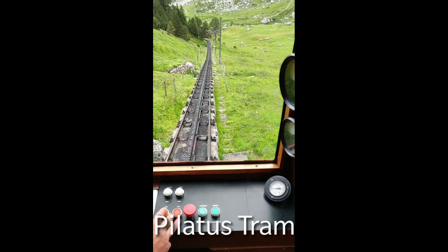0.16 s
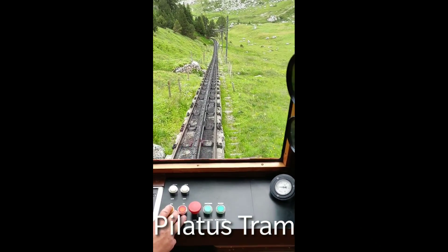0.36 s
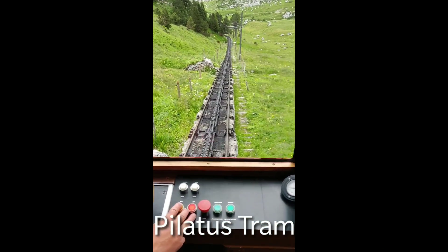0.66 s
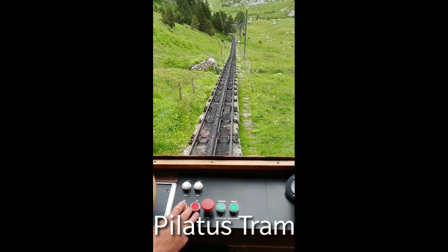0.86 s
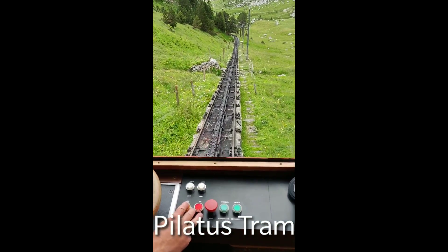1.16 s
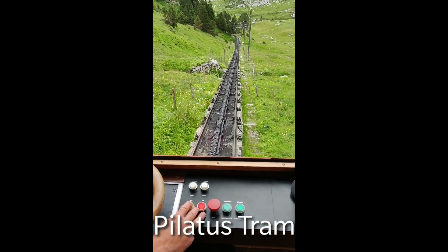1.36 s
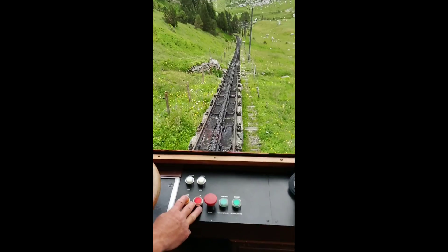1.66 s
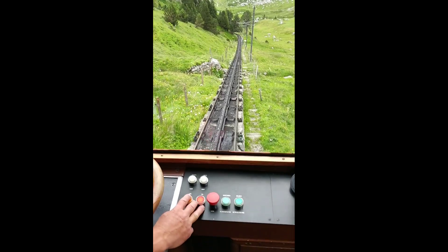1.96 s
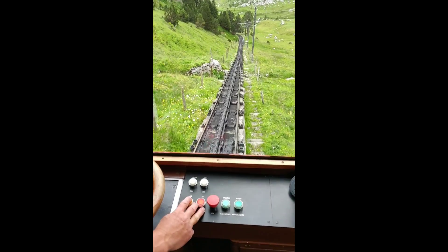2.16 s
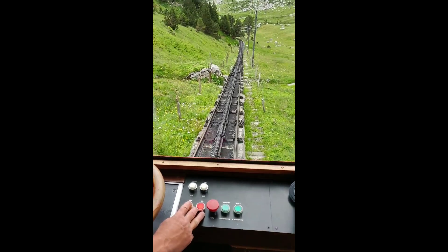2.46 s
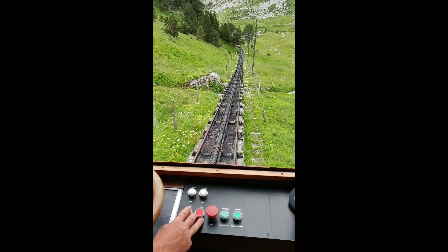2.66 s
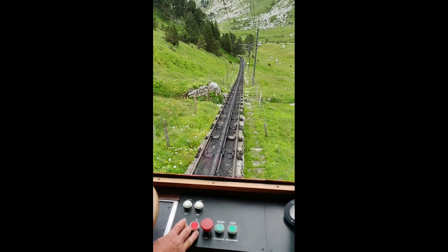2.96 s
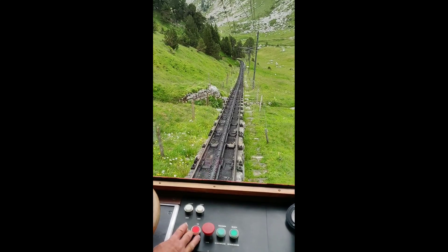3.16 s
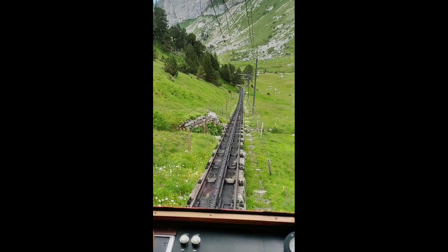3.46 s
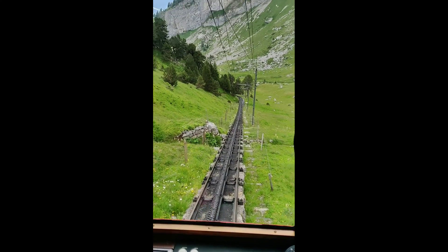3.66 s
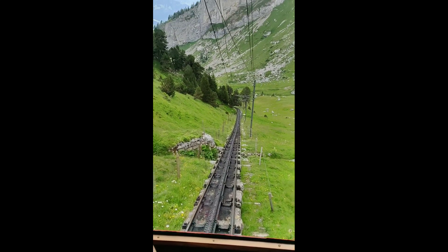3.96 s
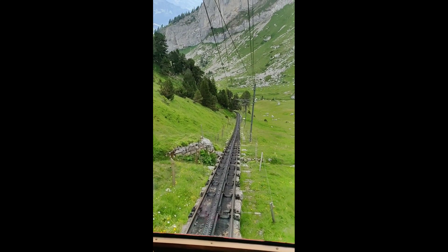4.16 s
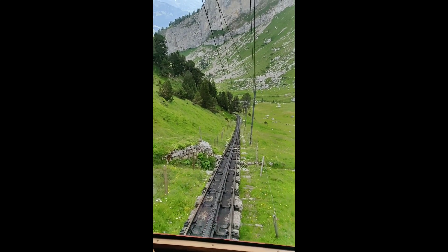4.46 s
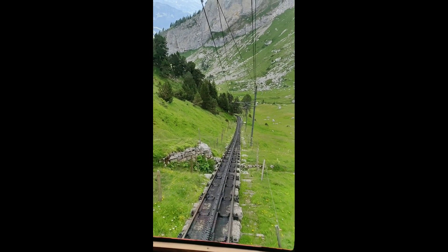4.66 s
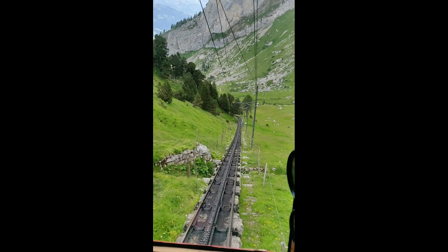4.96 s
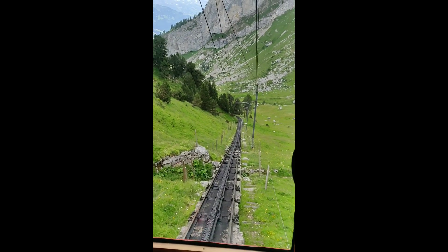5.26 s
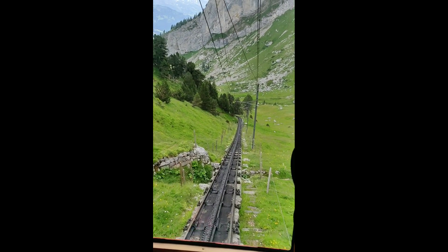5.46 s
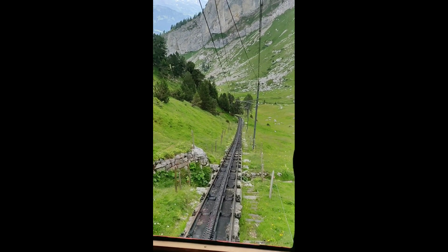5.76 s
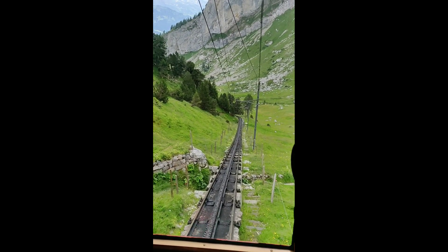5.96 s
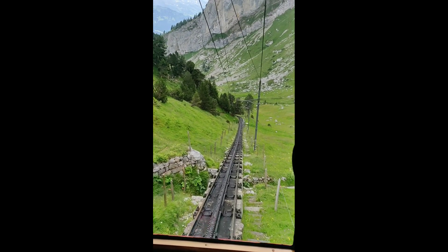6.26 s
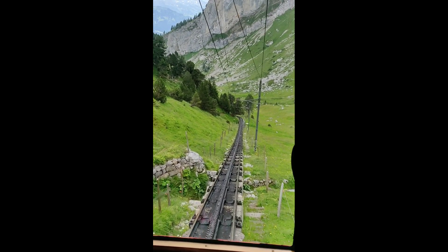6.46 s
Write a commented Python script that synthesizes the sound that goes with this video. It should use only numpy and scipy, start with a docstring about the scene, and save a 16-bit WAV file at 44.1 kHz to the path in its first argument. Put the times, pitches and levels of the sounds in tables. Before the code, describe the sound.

Inside a small wooden cog railway cab, wheels and gears drone loudly at an even pace, with a deep boom, midrange rushing and a gentle swell twice a second. A small clockwork instrument ticks crisply about six times a second with an extra tick each second. Around 1.3 seconds a rail joint gives a thump and gritty steel scrub; more dull floor thumps follow. Close stereo pickup within the cab.

```python
"""Cog railway cab on a steep rack

Inside a wooden cab rolling at an even pace: coloured noise booms and rushes through the body modes and
swells once a wheel turn, while wandering sines on multiples of the tooth rate sing the gear drone.
Decaying sines thump through the floor and rough noise scrubs at a rail joint. The clockwork speed recorder
ticks six times a second, plus one extra each round, in short noise bursts; thin motor whines lie behind."""
import sys
import numpy as np
from scipy import signal
from scipy.fft import rfft, irfft, next_fast_len
from scipy.io import wavfile

SR = 44100
rng = np.random.default_rng(int(sys.argv[2]) if len(sys.argv) > 2 else 0)


def digitize_waveform(pressure):
    """Quantize a signal to 16-bit integers and store it at the path in sys.argv[1].

    Rows of a 2-D input are taken as channels; values are limited to [-1, 1].
    """
    field = np.atleast_2d(pressure).T
    bounded = np.clip(field, -1, 1)
    quanta = np.round(bounded * 32767).astype(np.int16)
    wavfile.write(sys.argv[1], SR, quanta)


N = 291501
SECONDS = np.arange(N) / SR
SIZE = next_fast_len(N + 8192)
HZ = np.arange(1, SIZE // 2 + 2) * SR / SIZE   # frequency bins, one step up to keep clear of log 0
MESH_HZ = 97.25   # tooth contacts a second

# the ride: (time [s], rolling noise 700-2800 Hz [dB], drone 310-700 Hz [dB]), before swells and flicker
RIDE_LEVELS = [(0.0, -31, -17), (0.11, -28, -16.5), (0.2, -30, -19.5), (0.7, -31.5, -19),
               (0.9, -29.5, -18.5), (1.25, -30, -21), (1.36, -26, -17), (1.6, -32.5, -21),
               (1.99, -28, -17.5), (2.08, -32.5, -22), (2.41, -27.5, -18), (2.59, -31, -20.5),
               (3.41, -28.5, -17.5), (3.95, -30, -19), (4.13, -31.5, -19), (4.84, -29.5, -18.5),
               (5.2, -31.5, -20.5), (5.4, -30, -17.5), (5.8, -30, -20), (6.0, -31, -19.5), (6.61, -31, -17)]
# treble hiss 3-9 kHz, before swells and flicker: (time [s], level [dB])
HISS_LEVELS = [(0.0, -53), (0.59, -58.5), (1.18, -53.5), (1.38, -51), (1.53, -55.5), (2.52, -56),
               (3.52, -53), (3.7, -54.5), (4.46, -56.5), (4.88, -55.5), (4.99, -57), (5.98, -54.5),
               (6.06, -56), (6.61, -57.5)]
# smooth colours of the four noises: (frequency [Hz], density [dB per Hz])
BOOM_COLOUR = [(15, -26), (32, -11), (55, -17), (70, -15), (110, -8), (165, -11.5), (200, -40.5)]
DRONE_COLOUR = [(150, -40.5), (180, -6.5), (300, -3.5), (480, -5.5), (520, -10), (700, -14), (850, -35.5)]
ROLL_COLOUR = [(600, -27), (750, -0.5), (1000, -5), (1400, -9.5), (2000, -21.5), (2600, -25.5),
               (3100, -33.5), (4000, -59.5)]
HISS_COLOUR = [(2500, -13.5), (3300, -1.5), (5500, -8), (9500, -14.5), (13300, -17), (14000, -35)]
# swell up and down once a wheel turn: (boom [dB], drone [dB], rolling [dB], hiss [dB])
TURN_SWELLS_DB = (0.43, 0.47, 0.46, .7)
TURN_S, TURN_PEAK_S = 0.5, 0.36   # one wheel turn; moment of the first swell
BOOM_DB, BOOM_FOLLOWS = -21, 0.23   # mean level 60-170 Hz; share of the rolling noise's swing


def body():
    """Wheels and cogs shake the wooden body: four noises swell each turn, the upper two also flicker."""
    roll_db, drone_db = in_time(RIDE_LEVELS)
    hiss_db, = in_time(HISS_LEVELS)
    boom_db = BOOM_DB + BOOM_FOLLOWS * (roll_db - np.mean(roll_db))
    turn = np.cos(2 * np.pi * (SECONDS - TURN_PEAK_S) / TURN_S)
    levels_db = [boom_db, drone_db, roll_db, hiss_db]
    gains = [from_db(db + swell_db * turn) for db, swell_db in zip(levels_db, TURN_SWELLS_DB)]
    boom_gain, drone_gain, roll_gain, hiss_gain = gains

    boom = from_db(0.24 * drift(6.1)) * cab_noise(BOOM_COLOUR, (60, 170))
    drone = from_db(0.86 * drift(1.6)) * cab_noise(DRONE_COLOUR, (310, 700))
    roll = flickering(cab_noise(ROLL_COLOUR, (700, 2800)), [1000, 1500, 2200], depth_db=1.33, rate=13)
    hiss = flickering(cab_noise(HISS_COLOUR, (3000, 9000)), [5000, 9000], depth_db=-0.4, rate=10)

    # each tooth contact pushes the rolling noise up
    roll = roll * from_db(0.94 * np.sin(2 * np.pi * MESH_HZ * SECONDS))
    # the upper rolling noise and the hiss surge together
    surge_db = 1.15 * drift(12)
    lower = signal.sosfilt(signal.butter(1, 1600, "low", fs=SR, output="sos"), roll)
    roll = lower + from_db(surge_db) * (roll - lower)
    hiss = from_db(1.1 * surge_db) * hiss
    return boom_gain * boom + drone_gain * drone + roll_gain * roll + hiss_gain * hiss


# strongest gear order, the third: (time [s], level [dB])
LOAD_LEVELS = [(0.0, -18.5), (0.62, -18), (0.72, -26), (0.92, -18), (2.28, -21.5), (2.52, -18), (3.13, -22),
               (3.16, -29), (3.42, -20), (4.03, -24), (4.07, -19), (4.84, -24.5), (4.86, -17.5),
               (5.38, -29), (5.41, -20.5), (6.18, -20), (6.55, -26), (6.61, -16)]
# orders as multiples of the mesh rate: (multiple [1])
GEAR_ORDERS = [2, 3, 6, 7, 9, 10, 15, 17, 20]
# one row for each of these orders: (level against the load [dB], left minus right [dB])
GEAR_ORDER_LEVELS = [(-16, -3), (0, -2.5), (-16.5, 6.5), (-24, 0), (-29, -10.5), (-29, 5), (-36, 3),
                     (-36, -6), (-43, -0.5)]
# fifth gear order, on its own course: (time [s], level [dB])
FIFTH_LEVELS = [(0.0, -35), (0.35, -25), (0.48, -37), (0.88, -26), (1.27, -32), (1.38, -18.5), (1.45, -45),
                (1.47, -31), (2.12, -26.5), (2.17, -47), (2.34, -31.5), (4.57, -28), (4.84, -21),
                (4.9, -29.5), (6.57, -31), (6.61, -30)]
FIFTH_PAN_DB = -8.5   # left minus right


def gears():
    """Tooth contacts repeat at the mesh rate; higher orders wander more and follow the load less."""
    turns = np.cumsum(MESH_HZ * (1 + .0012 * drift(2.5))) / SR
    load_db, = in_time(LOAD_LEVELS)
    steady_db = np.mean(load_db)
    fifth_db, = in_time(FIFTH_LEVELS)
    out = from_db(fifth_db) * wavering(5 * turns, FIFTH_PAN_DB, waver_db=1.2, slip=.65)
    for k, (level_db, pan_db) in zip(GEAR_ORDERS, GEAR_ORDER_LEVELS):
        load_swing_db = (load_db - steady_db) * min(3 / k, 1) ** 2
        tone = wavering(k * turns, pan_db, waver_db=.65 * np.sqrt(k), slip=.36 * np.sqrt(k))
        out = out + from_db(steady_db + level_db + load_swing_db) * tone
    return out


# floor thumps: (time [s], level before the soft attack [dB], pitch [Hz], t60 [s])
FLOOR_JOLTS = [(1.298, -2.5, 77.6, 0.21), (1.948, -7, 89.2, 0.33), (2.74, -18, 89.6, 0.47),
               (3.906, -6, 109, 0.18), (3.948, -6, 99.5, 0.2), (4.02, -11, 94, 0.3), (5.339, -5, 91, 0.27),
               (5.8, -12.5, 75.2, 0.63)]


def jolts():
    """Jolts thump through the floor as softly struck, decaying low sines."""
    out = np.zeros(N)
    for s, level_db, hz, t60 in FLOOR_JOLTS:
        age = np.maximum(SECONDS - s, 0)
        attack = 1 - np.exp(-age / .01)
        out += from_db(level_db - 60 * age / t60) * attack * np.sin(2 * np.pi * hz * age)
    return out


# steel scrubbing on steel, before the grit: (time [s], level [dB], hold [s], t60 [s])
JOINT_SCRUBS = [(1.243, -57, .03, .1), (1.316, -42.5, 0.032, .12), (1.347, -46, 0.033, .2)]
# scrub colour: (frequency [Hz], density [dB per Hz])
SCRUB_COLOUR = [(1200, -5), (2500, 0), (6000, -7), (10000, -9), (16500, -15)]
# faint narrow rasp after the joint, before the grit: (time [s], level [dB], hold [s], t60 [s])
JOINT_RASP = (1.452, -55, 0.06, .15)
# rasp colour: (frequency [Hz], density [dB per Hz])
RASP_TINT = [(5500, -20), (6800, -3), (8200, 1), (9500, -19)]
SCRUB_ATTACK_S, GRIT_PER_S, GRIT_SHARE = .006, 260, 0.55


def rail_joint():
    """Steel scrubs on steel at the joint: held noise roughened by a cluster of small random knocks."""
    scrub = sum(held(*row) for row in JOINT_SCRUBS) * cab_noise(SCRUB_COLOUR)
    rasp = held(*JOINT_RASP) * cab_noise(RASP_TINT)
    strength_db = 2.5 * np.minimum(rng.exponential(1, N), 3)
    hits = (rng.random(N) < GRIT_PER_S / SR) * from_db(strength_db)
    grit = 1 - GRIT_SHARE + GRIT_SHARE * rms_one(dying(hits, 0.032, .0004))
    return grit * (scrub + rasp)


def held(s, level_db, hold_s, t60):
    """Envelope that sets in, holds and dies away."""
    age = SECONDS - s
    attack = np.clip(age / SCRUB_ATTACK_S, 0, 1)
    return attack * from_db(level_db - 60 * np.maximum(age - hold_s, 0) / t60)


# six ticks and one extra each round, levels before envelope and layer gain:
# (time [s], level [dB], bright top against it [dB], knock of the case [dB])
RECORDER_TICKS = [(0.0328, -36.5, -13, -41), (0.2049, -36.5, -16, -46), (0.2668, -40, -15, -34),
                  (0.3701, -42, -9, -48), (0.5417, -36, -15, -45.5), (0.706, -36, -15, -41),
                  (0.8779, -36, -13, -44), (1.039, -38.5, -12, -48), (1.2141, -38.5, -16, -45.5),
                  (1.2775, -36, -19, -44), (1.3784, -38, -15, -45.5), (1.5499, -40, -14, -43),
                  (1.7145, -37.5, -15, -48), (1.8871, -41, -14, -44), (2.0477, -38.5, -16, -42),
                  (2.2223, -40, -14, -44), (2.284, -39.5, -18, -34), (2.3865, -38, -15, -45.5),
                  (2.5586, -37.5, -12, -49), (2.7232, -40.5, -11.5, -42), (2.8953, -35.5, -15.5, -36),
                  (3.0574, -41.5, -11, -45), (3.2301, -38, -13, -39), (3.2924, -41, -14, -38),
                  (3.3947, -38.5, -13, -47), (3.5668, -36.5, -17, -44), (3.733, -38, -16, -38),
                  (3.904, -37.5, -14, -43), (4.0706, -38, -18.5, -47), (4.2418, -38, -15, -44),
                  (4.3041, -38, -20, -36), (4.4049, -41, -14, -47), (4.5775, -39, -14, -45.5),
                  (4.7426, -44, -12, -47), (4.9127, -39, -14, -38), (5.0774, -38, -16, -43),
                  (5.2495, -40, -13, -45.5), (5.3138, -42, -16, -45.5), (5.4156, -40.5, -13, -43),
                  (5.5857, -37.5, -16, -45.5), (5.7493, -41, -11, -44), (5.9224, -38, -16, -51),
                  (6.0861, -38, -17, -44), (6.2597, -38.5, -16, -45.5), (6.321, -41, -15, -40),
                  (6.4218, -40.5, -14, -45.5), (6.5939, -38.5, -19, -42)]
# colours of tick, bright top and case knock: (frequency [Hz], density [dB per Hz])
TICK_COLOUR = [(2000, -10.5), (3500, -1.5), (6000, -2), (9500, -8), (11500, -22)]
TOP_COLOUR = [(8500, -25.5), (10500, -7.5), (14500, 0.5), (15200, -1), (16000, -9)]
KNOCK_COLOUR = [(1900, -17), (2600, 5), (3300, -6.5), (4800, -14.5), (6500, -22.5)]
TICK_PAN_DB, TICK_PAN_SPREAD_DB = 0.5, 0.8   # left minus right; from tick to tick
TICK_T60_S, TAIL_T60_S, TAIL_DB = .022, .15, -10   # tail gain against the first contact


def speed_recorder():
    """Each tick is a pawl dropping with two uneven bounces; the case knocks, the cab adds a short tail."""
    snaps, tops = np.zeros((2, 2, N + 2000))
    knocks = np.zeros(N)
    chance = rng.random((len(RECORDER_TICKS), 5))
    sides = rng.standard_normal(len(RECORDER_TICKS))
    for (s, level_db, top_db, knock_db), c, side in zip(RECORDER_TICKS, chance, sides):
        pan_db = TICK_PAN_DB + TICK_PAN_SPREAD_DB * side
        gain = from_db(level_db + np.array([.5, -.5]) * pan_db)
        contacts = [   # lag [s], loss [dB]
            (-.0012, 3 * c[4]),
            (.001 + .004 * c[0], 5 + 10 * c[1]),
            (.009 + .007 * c[2], 7 + 10 * c[3])]
        for lag_s, loss_db in contacts:
            at = round((s + lag_s) * SR)
            snaps[:, at] += gain * from_db(-loss_db)
            tops[:, at] += gain * from_db(top_db - loss_db)
        knocks[round(s * SR)] = from_db(knock_db)

    out = dying(knocks, 0.027, 0.00053) * cab_noise(KNOCK_COLOUR)
    for clicks, colour, share, rise_s in [(snaps, TICK_COLOUR, .48, .002), (tops, TOP_COLOUR, 2.1, .0009)]:
        contact = dying(clicks[:, :N], TICK_T60_S, rise_s)
        tail = from_db(TAIL_DB) * dying(clicks[:, :N], TAIL_T60_S, .002)
        noise = flickering(cab_noise(colour), [5500, 7500, 13000], depth_db=2.0, rate=12)
        out = out + share * (contact + tail) * noise
    return out


# whines, levels before they waver: (pitch [Hz], rms level [dB])
MOTOR_WHINES = [(1106, -51), (1876, -64)]


def motor():
    """Thin whines off the gear series, sines that waver in level and phase."""
    whines = [from_db(db) * wavering(hz * SECONDS, 0, waver_db=3, slip=2.2) for hz, db in MOTOR_WHINES]
    return sum(whines)


# cab and panel modes: (frequency [Hz], width [Hz], lift left [dB], lift right [dB])
CAB_MODES = [(87.5, 24, 7.5, 5.5), (129.3, 20, 4.5, 2), (191, 19, 10, 5), (200.3, 9.7, -8, -1.5),
             (258.4, 30, 5, 6), (348, 12, 0, 4), (450.6, 29, 4, 6), (656, 20, 1.5, -2),
             (1010, 16, -6, -6.5), (983.5, 31, 3.5, 8.5), (1210, 22, 1, 2.5), (1340, 37, 6.5, 1),
             (1384, 49, -9, -3.5), (1870, 34, 9, 6.5), (2060, 31, 1.5, 3.5), (2470, 610, -0.5, 4.5),
             (6600, 260, 2.5, -0.5), (12500, 5000, -2, 1)]
# likeness of the two ears: (frequency [Hz], correlation [1])
EAR_LIKENESS = [(25, 0.96), (110, 0.99), (145, 1), (190, 0.38), (250, 0.86), (300, 0.96), (380, 0.87),
                (560, 0.58), (750, 0.26), (950, .0), (2500, 0.018), (4000, 0)]


def cab_noise(spectrum, band=(20, 20000)):
    """Stereo noise coloured by its source and by the cab modes at each ear; rms 1 within the band."""
    mid, side = rfft(rng.standard_normal((2, SIZE)))
    alike = np.clip(at_hz(EAR_LIKENESS), -1, 1)
    pair = np.sqrt(1 + alike) * mid + np.sqrt(1 - alike) * side * [[1], [-1]]
    modes_db = sum(np.outer([left_db, right_db], bell(hz, width_hz))
                   for hz, width_hz, left_db, right_db in CAB_MODES)
    inside = (HZ > spectrum[0][0]) & (HZ < spectrum[-1][0])
    pair = pair * inside * from_db(at_hz(spectrum) + modes_db)
    in_band = (HZ > band[0]) & (HZ < band[1])
    power = np.sum(np.abs(pair[:, in_band]) ** 2) / SIZE ** 2   # mean of both ears
    return irfft(pair, SIZE)[:, :N] / np.sqrt(power)


def wavering(turns, pan_db, waver_db, slip):
    """A sine at each ear whose level and phase wander, the phase a little differently left and right."""
    phase = 2 * np.pi * turns + slip * drift(5.84)
    level_db = waver_db * drift(3.3)
    ears = [from_db(level_db + side * pan_db / 2) * np.sin(phase + slip * 0.28 * drift(2.1))
            for side in (1, -1)]
    return np.sqrt(2) * np.array(ears)


def flickering(x, edges_hz, depth_db, rate):
    """Each range between two edges swells and sinks on its own."""
    run_in = np.concatenate([2 * x[:, :1] - x[:, 500:0:-1], x], axis=1)   # filters start settled
    lows = [signal.sosfilt(signal.butter(2, hz, "low", fs=SR, output="sos"), run_in)[:, -N:]
            for hz in edges_hz]
    edges = [0] + lows + [x]
    return sum((high - low) * from_db(depth_db * drift(rate)) for low, high in zip(edges, edges[1:]))


def dying(clicks, t60, rise_s):
    """Envelope that rises quickly after each click and dies away."""
    fall, rise = from_db(-60 / (t60 * SR)), np.exp(-1 / (rise_s * SR))
    return signal.lfilter([1 - rise], np.convolve([1, -fall], [1, -rise]), clicks + 1e-18)


def drift(rate):
    """Slow random curve of rms 1: noise through two equal low-pass poles at rate [Hz]."""
    r = np.exp(-80 * np.pi * rate / SR)   # computed at every 40th sample
    slow = signal.lfilter([1], [1, -2 * r, r * r], rng.standard_normal(N // 40 + 2002))[2000:]
    return np.interp(np.arange(N) / 40, np.arange(len(slow)), rms_one(slow))


def from_db(db):
    """Decibels to gain."""
    return 10 ** (np.asarray(db) / 20)


def rms_one(x):
    """Scaled to rms 1."""
    return x / np.sqrt(np.mean(x ** 2) + 1e-20)


def in_time(rows):
    """Columns of a table as curves, one value a sample."""
    s, *columns = np.transpose(rows)
    return [np.interp(SECONDS, s, c) for c in columns]


def at_hz(points):
    """A short spectrum read at every frequency bin."""
    hz, value = np.transpose(points)
    return np.interp(np.log(HZ), np.log(hz), value)


def bell(hz, width_hz):
    """Shape of a resonance over the frequency bins, 1 on top."""
    return 1 / (1 + (2 * (HZ - hz) / width_hz) ** 2)


def scene():
    """All sources at the two microphones."""
    return body() + gears() + jolts() + rail_joint() + speed_recorder() + motor()


# microphone port resonances, left then right: (frequency [Hz], width [Hz], lift [dB])
MIC_PORTS = [(6840, 1100, 9), (7930, 1400, 8.5)]
CUTOFF_HZ = 15800


def record(dry):
    """Each port lifts its own treble range; high peaks are rounded, the top is cut, the start fades in."""
    lift = from_db([lift_db * bell(hz, width_hz) for hz, width_hz, lift_db in MIC_PORTS])
    run_in = np.concatenate([2 * dry[:, :1] - dry[:, 2000:0:-1], dry], axis=1)   # filters start settled
    coloured = irfft(rfft(run_in, SIZE) * lift, SIZE)[:, :N + 2000]
    rounded = coloured / (1 + np.abs(coloured / .97) ** 6) ** (1 / 6)
    steep = signal.ellip(14, .3, 80, CUTOFF_HZ - 100, fs=SR, output="sos")
    fade_in = np.sin(np.minimum(SECONDS / .003, 1) * np.pi / 2) ** 2
    return signal.sosfilt(steep, rounded)[:, 2000:] * fade_in


dry = scene()
out = record(dry)
digitize_waveform(out)
```